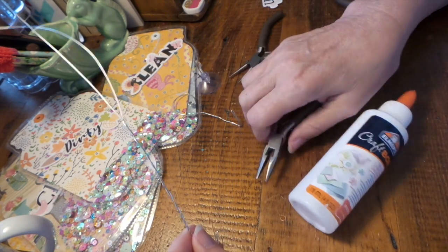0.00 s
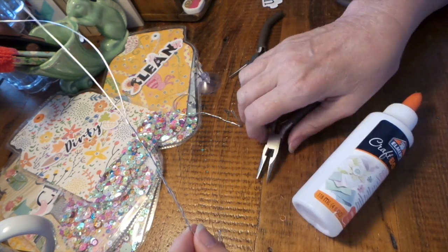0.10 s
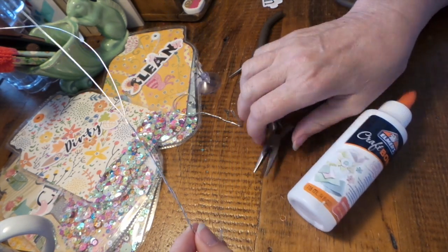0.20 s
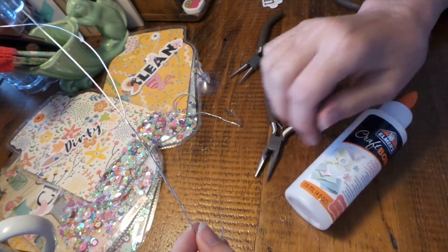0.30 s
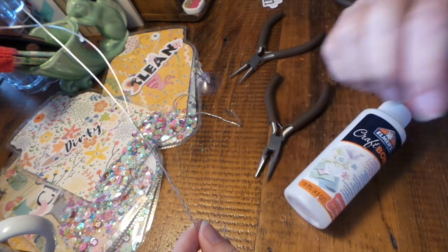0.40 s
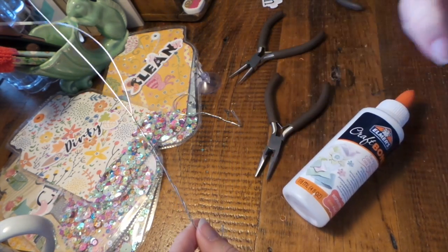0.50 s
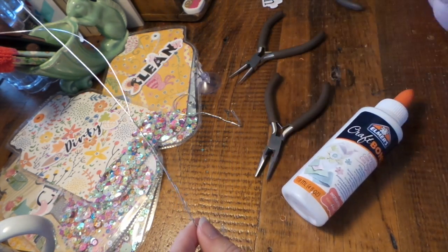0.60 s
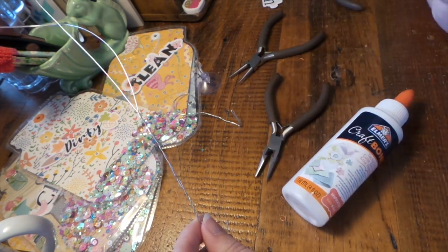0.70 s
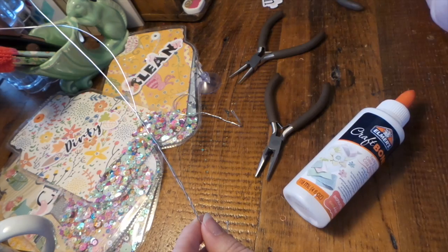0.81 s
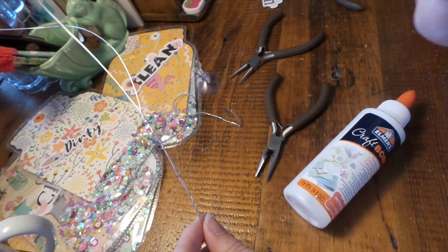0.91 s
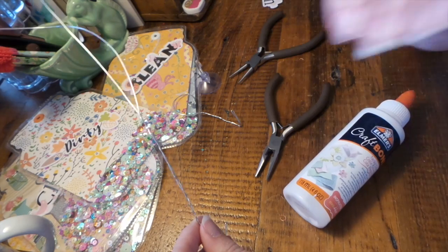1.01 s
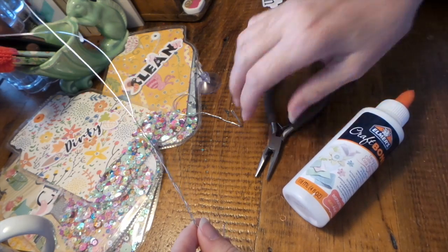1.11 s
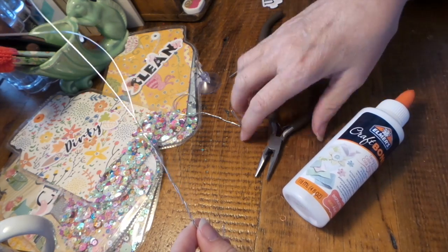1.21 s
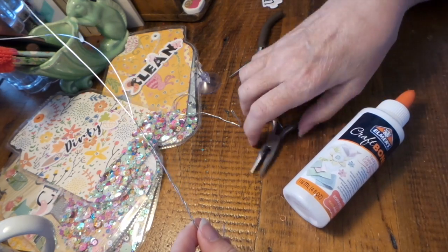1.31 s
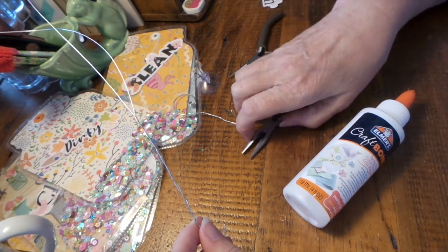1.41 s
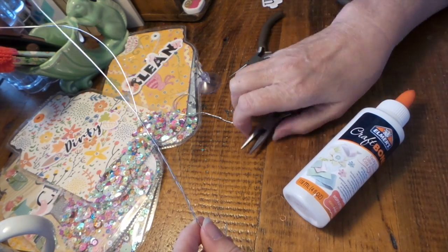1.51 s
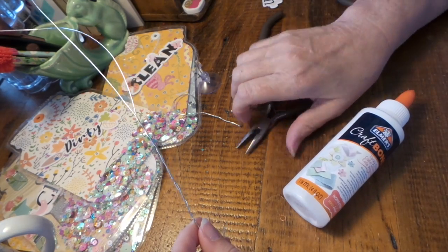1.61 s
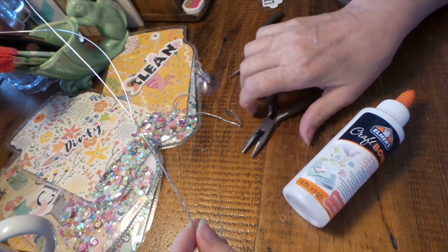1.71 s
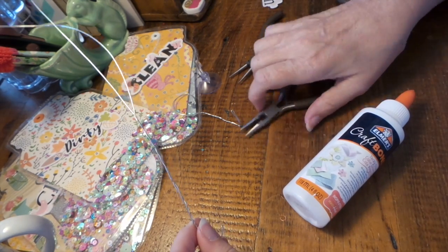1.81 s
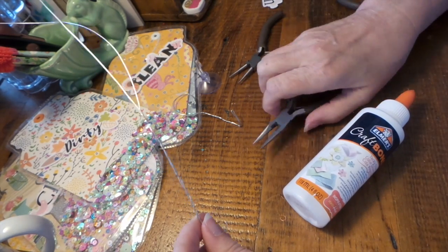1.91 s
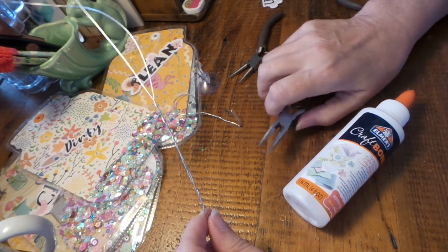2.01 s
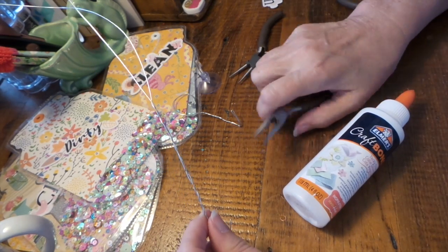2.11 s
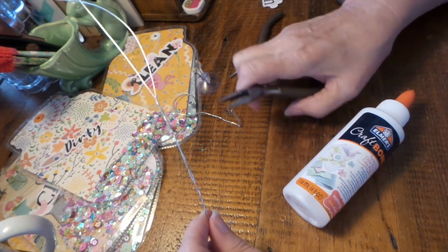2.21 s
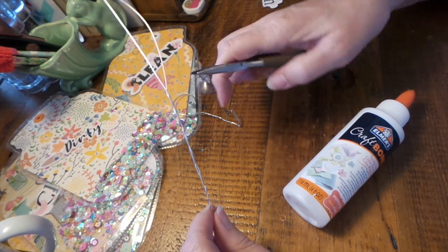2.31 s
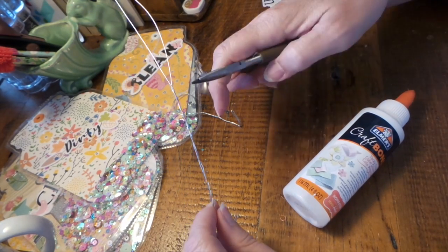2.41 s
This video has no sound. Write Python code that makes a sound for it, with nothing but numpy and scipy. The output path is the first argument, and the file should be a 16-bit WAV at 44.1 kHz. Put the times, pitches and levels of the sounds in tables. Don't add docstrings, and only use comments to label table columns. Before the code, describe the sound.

Small steel pliers clatter down on a wooden table, then are grasped, scraped and lifted again

```python
import sys
import numpy as np
from scipy import signal
from scipy.fft import rfft, irfft
from scipy.io import wavfile
from scipy.ndimage import uniform_filter1d

SR = 44100
rng = np.random.default_rng(int(sys.argv[2]) if len(sys.argv) > 2 else 0)


def natural_amplitude(level_db):
    exponent = np.asarray(level_db, float) / 20
    return 10 ** exponent


def dump(signal):
    limited = np.clip(np.atleast_2d(signal).T, -1, 1)
    pcm = np.round(limited * 32767).astype(np.int16)
    wavfile.write(sys.argv[1], SR, pcm)


N = 110250

# f/Hz, level/dB
HUSH_SPECTRUM = [(25, -22), (60, -8.5), (120, -0.5), (280, -9), (560, -13.5), (2500, -31), (6000, -34.5),
                 (14000, -36)]
# f/Hz, width/Hz, level/dB
HUM_RESONANCES = [(119.5, 17, -50.5), (192.5, 33, -58), (262.4, 32, -53.5), (389, 5.6, -64.5)]
# t/s, level/dB
HUM_SWELL = [(0, 6), (0.498, 7.5), (.9, 0.5), (1.6, 7.5), (1.95, 9), (2.201, 0.5), (2.5, 1)]
# t/s, steel tick/dB, knock/dB, knock f/Hz, tick f/Hz
LIGHT_TAPS = [(0.1107, -40.5, -44, 1470, 11000), (0.153, -34.5, -52, 2500, 6860),
              (0.55, -38.5, -43, 865, 6000), (0.566, -41, -41.5, 830, 4200), (0.65, -39.5, -42, 1590, 6500),
              (0.686, -46, -40, 1700, 3500), (0.702, -68, -40.5, 1390, 3500), (0.75, -43, -49, 1150, 3600),
              (0.8818, -27, -31, 1690, 3400), (1.012, -55, -45.5, 800, 3500),
              (1.082, -27.5, -27, 1250, 4940), (1.093, -39, -35, 2030, 5500),
              (0.89, -38, -38.5, 1770, 3200), (1.194, -43, -28, 846, 2280), (1.1943, -55, -32, 1900, 2300),
              (1.464, -29, -55, 2000, 14500), (1.473, -31, -61, 2000, 13000),
              (1.86, -28, -37.5, 1340, 7150), (1.899, -40, -45.5, 547, 4000),
              (1.974, -35, -44.5, 1510, 9100), (2.014, -45, -47, 1530, 3500), (2.228, -40, -62, 1510, 4530)]
# t/s, table thump/dB, handle knock/dB, knock f/Hz
SET_DOWN = [(0.2255, -15.5, -15.5, 1900), (0.2698, -26, -22, 2280), (0.2831, -11, -5, 1050),
            (0.2862, -21, -10, 1140), (0.294, -19.5, -10, 754), (0.2992, -12, -13, 790),
            (0.3126, -18, -16.5, 1000), (0.324, -23, -15, 1100), (0.345, -32, -26, 1130),
            (0.3598, -10.5, -23, 600), (0.3642, -15.5, -13.5, 850), (0.3894, -27.5, -22.5, 766),
            (0.4010, -12.5, -23, 680), (0.417, -24, -24, 770), (0.432, -48, -37, 600)]
# t/s, table thump/dB, handle knock/dB, knock f/Hz
GRASP = [(1.2669, -11.5, -21, 734), (1.2750, -14, -23.5, 740), (1.3068, -32, -29, 1120),
         (1.385, -29.5, -50, 2720), (1.4024, -28, -36, 1070), (1.4892, -16, -3.5, 3440),
         (1.4883, -29.5, -12, 1000), (1.5010, -44, -13, 2970), (1.5086, -23, -14.5, 2640),
         (1.5201, -30, -32, 2900), (1.7019, -14.5, -4, 1396), (1.714, -52, -22, 1550),
         (1.7568, -22, -48, 1750), (1.7633, -26, -11, 2550), (1.7790, -20, -21.5, 1000),
         (1.788, -52, -34, 1480)]
# t/s, level/dB, centre f/Hz
JAW_TICKS = [(0.2268, -12.5, 5250), (0.2271, -10.5, 13500), (0.2703, -17, 3500), (0.2835, -10, 11600),
             (0.286, -14, 7000), (0.296, -11, 11000), (0.323, -16.5, 9500), (0.3448, -18, 11000),
             (0.3612, -15.5, 8500), (0.368, -26, 5000), (0.392, -23, 7000), (0.4013, -15.5, 9000),
             (0.4186, -19, 10000), (0.432, -33, 8500), (1.2660, -15, 10000), (1.2725, -17.5, 8500),
             (1.3057, -30, 9000), (1.3606, -29, 11000), (1.373, -25, 4200), (1.3746, -29.5, 7500),
             (1.38, -18, 8060), (1.3838, -23, 8000), (1.39, -35, 7000), (1.402, -39, 4200),
             (1.4883, -13, 12100), (1.488, -12, 4100), (1.507, -19, 12000), (1.5112, -10.5, 4460),
             (1.5214, -18, 6000), (1.7019, -14, 13000), (1.7009, -14.5, 6540), (1.716, -33, 7000),
             (1.731, -27, 10900), (1.7575, -31, 12000), (1.7648, -14.5, 10900), (1.7790, -22, 7500),
             (1.785, -26, 12700)]
# t/s, level/dB
PALM_PRESSES = [
    (0.229, -47),
    (0.403, -31),
    (1.268, -10),
    (1.285, -15),
    (1.487, -44),
    (1.778, -20),
]
# start t/s, length/s, steel/dB, handles/dB, handle centre f/Hz
SLIDES = [(0.28, 0.046, -27, -18.5, 1400), (0.313, 0.16, -34.5, -32.5, 865), (1.258, 0.16, -40, -43, 714),
          (1.36, 0.024, -37.5, -53, 2820), (1.369, .034, -37, -40, 2840), (1.379, 0.11, -45, -47.5, 1400),
          (1.489, 0.021, -32, -20.5, 3050), (1.499, 0.045, -41, -32, 2570), (1.487, 0.086, -57, -33, 704),
          (1.7, 0.058, -30, -26.5, 1580), (1.755, 0.038, -30.5, -30, 2220), (1.78, 0.28, -62, -54.5, 1540)]
# f/Hz, level/dB, t60/s
TABLE_MODES = [(118, -3, .15), (185, -3, .06), (245, 0, .035), (290, -2, .03), (377, -2, .03),
               (440, -4, .03), (540, -5, .025)]
HANDLE_MODES = [(600, 10, 0.011), (752, 2.5, 0.015), (863, -4.5, 0.049), (1000, 10.5, 0.0049),
                (1097.5, 5, 0.02), (1206, 3.5, 0.0098), (1447, 0.5, 0.02), (1580, -1, 0.021),
                (1900, 0, 0.017), (2064, 0, 0.014), (2565, 2.5, 0.019), (2900, 0, 0.012),
                (3700, -22.5, 0.0049), (4180, -2.5, 0.004)]
JAW_MODES = [(2550, 1, 0.0049), (3280, -1, 0.0035), (4170, -10, .016), (4750, 0, 0.0028),
             (5530, -8, 0.0041), (6790, -4.5, 0.0047), (7480, -2, 0.002), (8500, 2, 0.0025),
             (10000, -2, 0.0022), (11290, -3, 0.0029), (12470, 2, 0.0023), (13500, -2, 0.003),
             (14900, -10, .002)]
# f/Hz, t60/s
ROOM_T60 = [(100, 0.22), (500, 0.21), (1500, 0.28), (4000, 0.17), (12000, 0.23)]
# low f/Hz, high f/Hz, level/dB
SLEEVE_BAND = (7100, 16300, -57)
# start t/s, end t/s
TREBLE_DIPS = [
    (.213, .2245),
    (.2755, .282),
    (1.255, 1.2645),
    (1.688, 1.6995),
]

HUSH_DB, MAINS_HZ, MAINS_DB = -50, 115.7, -60.5
THUMP_DB, KNOCK_DB, JAW_DB, TAP_DB = 1.5, 5.5, -29, -26
CONTACT_S, JAW_CHATTER_S, TAP_CHATTER_S = 0.0011, 0.0037, 0.0027
JAW_FALL_DB_PER_OCT, TAP_FALL_DB_PER_OCT, SLIDE_FALL_DB_PER_OCT = 5.5, 14, 11
KNOCK_CYCLES, HANDLE_RING_DB, LONGEST_KNOCK_RING_S = 0.73, -25.5, 0.03
SLIPS_PER_S, SLIDE_STEEL_DB, SLIDE_HANDLE_DB, SLIDE_STEEL_T60_S = 2200, -21, -22.5, 0.002
LOW_CUT_HZ = 155.6
ROOM_DB, ROOM_DULL_HZ, ROOM_STARTS_S, ROOM_BUILDS_S = -10.5, 6000, 0.004, 0.005
SLEEVE_S, SLEEVE_LENGTH_S = 0.78, 0.25
DIP_DB, DIP_ABOVE_HZ = -15, 3000
TOP_CUT_HZ, ROUNDING_LEVEL = 16800, 1.134


def rms_one(x):
    return x / np.sqrt(np.mean(x ** 2) + 1e-20)


def at_hz(points, hz):
    table_hz, value = np.array(points).T
    return np.interp(np.log(hz), np.log(table_hz), value)


def butter(x, order, hz, kind):
    return signal.sosfilt(signal.butter(order, hz, kind, fs=SR, output="sos"), x)


def octaves_off(modes, centre_hz):
    return abs(np.log2(np.array(modes)[:, 0] / centre_hz[:, None]))


def ring(clicks, hz, t60_s):
    r = natural_amplitude(-60 / (t60_s * SR))
    w = 2 * np.pi * hz / SR
    return signal.lfilter([0, np.sin(w)], [1, -2 * r * np.cos(w), r * r], clicks + 1e-18)


def strike(s, db, modes, fall_db=0, spread_db=3.5, chatter_s=0):
    out = np.zeros(N)
    luck_db = spread_db * rng.standard_normal((len(s), len(modes))) - fall_db
    grit = rng.standard_normal(N)
    for k, (hz, level_db, t60_s) in enumerate(modes):
        clicks = np.zeros(N)
        np.add.at(clicks, (s * SR).astype(int), natural_amplitude(db + level_db + luck_db[:, k]))
        if chatter_s:
            r = np.exp(-1 / (chatter_s * SR))
            clicks = signal.lfilter([.2], np.convolve([1, -r], [1, -.9]), clicks + 1e-18) * grit
        out += ring(clicks, hz, t60_s)
    return out


def shaped_noise(gain):
    return rms_one(irfft(rfft(rng.standard_normal(N)) * gain, N))


def hum():
    hz = np.maximum(np.fft.rfftfreq(N, 1 / SR), 10)
    t = np.arange(N) / SR
    hush = natural_amplitude(HUSH_DB) * shaped_noise(natural_amplitude(at_hz(HUSH_SPECTRUM, hz)))
    tones = natural_amplitude(MAINS_DB) * np.sin(2 * np.pi * MAINS_HZ * t)
    for centre_hz, width_hz, db in HUM_RESONANCES:
        tones += natural_amplitude(db) * shaped_noise(1 / (1 + (2 * (hz - centre_hz) / width_hz) ** 2))
    swell_db = np.interp(t, *np.transpose(HUM_SWELL))
    return natural_amplitude(swell_db) * tones + natural_amplitude(0.75 * swell_db) * hush


def wire_ticks():
    s, tick_db, _, _, tick_hz = np.transpose(LIGHT_TAPS)
    fall_db = TAP_FALL_DB_PER_OCT * octaves_off(JAW_MODES, tick_hz)
    return strike(s, tick_db + TAP_DB, JAW_MODES, fall_db, spread_db=3.0, chatter_s=TAP_CHATTER_S)


def handle_knocks():
    touch_s, _, touch_db, touch_hz = np.transpose(SET_DOWN + GRASP)
    tap_s, _, tap_db, tap_hz, _ = np.transpose(LIGHT_TAPS)
    s, centre_hz = np.r_[touch_s, tap_s], np.r_[touch_hz, tap_hz]
    db = np.r_[touch_db, tap_db] + KNOCK_DB
    burst_n = np.arange(600)
    cycles = centre_hz[:, None] * burst_n / SR
    envelope = np.exp(-cycles / KNOCK_CYCLES) * np.tanh(3 * cycles)
    bursts = -natural_amplitude(db)[:, None] * np.sin(2 * np.pi * cycles) * envelope
    flex = np.zeros(N + 600)
    np.add.at(flex, (s * SR).astype(int)[:, None] + burst_n, bursts)
    rings = 0
    for k, (hz, level_db, t60_s) in enumerate(HANDLE_MODES):
        polarity = (-1) ** k
        rings = rings + polarity * natural_amplitude(level_db) * ring(flex, hz, min(t60_s, LONGEST_KNOCK_RING_S))
    return (flex + natural_amplitude(HANDLE_RING_DB) * rings)[:N]


def table_thumps():
    s, thump_db, _, _ = np.transpose(SET_DOWN + GRASP)
    contact = np.hanning(int(CONTACT_S * SR) + 3)
    return np.convolve(strike(s, thump_db + THUMP_DB, TABLE_MODES), contact / contact.sum())[:N]


def jaw_ticks():
    s, db, centre_hz = np.transpose(JAW_TICKS)
    fall_db = JAW_FALL_DB_PER_OCT * octaves_off(JAW_MODES, centre_hz)
    return strike(s, db + JAW_DB, JAW_MODES, fall_db, spread_db=4.5, chatter_s=JAW_CHATTER_S)


def palm_presses():
    return strike(*np.transpose(PALM_PRESSES), TABLE_MODES[:2], spread_db=7.0)


def slides():
    s, length_s, steel_db, handle_db, centre_hz = np.transpose(SLIDES)
    progress = np.clip((np.arange(N) / SR - s[:, None]) / length_s[:, None], 0, 1)
    shapes = np.sin(np.pi * progress ** .5)
    sizes = natural_amplitude(np.minimum(rng.exponential(1, N), 4)) * rng.choice([-1, 1], N)
    slips = rms_one(sizes * (rng.random(N) < SLIPS_PER_S / SR))
    fall_db = SLIDE_FALL_DB_PER_OCT * octaves_off(HANDLE_MODES, centre_hz)
    out = np.zeros(N)
    steel_drive = slips * (natural_amplitude(steel_db) @ shapes)
    for hz, db, _ in JAW_MODES:
        out += ring(natural_amplitude(db + SLIDE_STEEL_DB) * steel_drive, hz, SLIDE_STEEL_T60_S)
    for k, (hz, db, t60_s) in enumerate(HANDLE_MODES):
        strength = natural_amplitude(handle_db + db + SLIDE_HANDLE_DB - fall_db[:, k])
        out += ring(slips * (strength @ shapes), hz, t60_s)
    return out


def pliers():
    steel = wire_ticks() + handle_knocks() + jaw_ticks() + slides()
    table = table_thumps() + palm_presses()
    return butter(steel - table, 3, LOW_CUT_HZ, "high")


def room(x):
    t = np.arange(SR) / SR
    edges_hz = 60 * 2 ** np.arange(0, 8.1, .5)
    tail = 0
    for low_hz, high_hz in zip(edges_hz, edges_hz[1:]):
        band = butter(rng.standard_normal(SR), 2, [low_hz, high_hz], "band")
        hz = np.sqrt(low_hz * high_hz)
        decay = natural_amplitude(-60 * t / at_hz(ROOM_T60, hz))
        tail = tail + band * decay / np.sqrt(1 + (hz / ROOM_DULL_HZ) ** 2)
    tail = tail * np.clip((t - ROOM_STARTS_S) / ROOM_BUILDS_S, 0, 1)
    return natural_amplitude(ROOM_DB) * signal.fftconvolve(x, tail / 20)[:N]


def sleeve():
    low_hz, high_hz, db = SLEEVE_BAND
    rustle = rms_one(butter(rng.standard_normal(N), 2, [low_hz, high_hz], "band"))
    progress = np.clip((np.arange(N) / SR - SLEEVE_S) / SLEEVE_LENGTH_S, 0, 1)
    return natural_amplitude(db) * rustle * np.sin(np.pi * progress)


def dip_treble_before_hits(x):
    t = np.arange(N) / SR
    highpass = signal.butter(2, DIP_ABOVE_HZ, "high", fs=SR, output="sos")
    treble = signal.sosfiltfilt(highpass, x)
    dips = sum(1. * (t > start_s) * (t < end_s) for start_s, end_s in TREBLE_DIPS)
    return x - (1 - natural_amplitude(DIP_DB)) * uniform_filter1d(dips, size=45) * treble


def scene():
    tool = pliers()
    return (hum() + tool + room(tool) + sleeve())[None]


def band_limit(x):
    return signal.sosfilt(signal.butter(12, 16850, fs=SR, output="sos"), x)


def record(dry):
    rounded = np.tanh(dry / ROUNDING_LEVEL)
    top_cut = signal.cheby2(10, 60, TOP_CUT_HZ, fs=SR, output="sos")
    mix = dip_treble_before_hits(signal.sosfilt(top_cut, rounded))
    return band_limit(mix)


dry = scene()
out = record(dry)
dump(out)
```